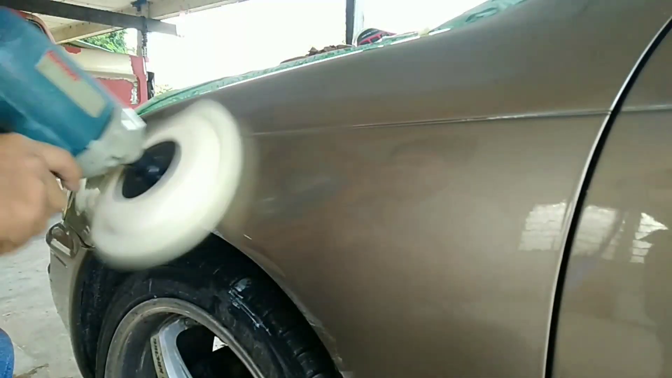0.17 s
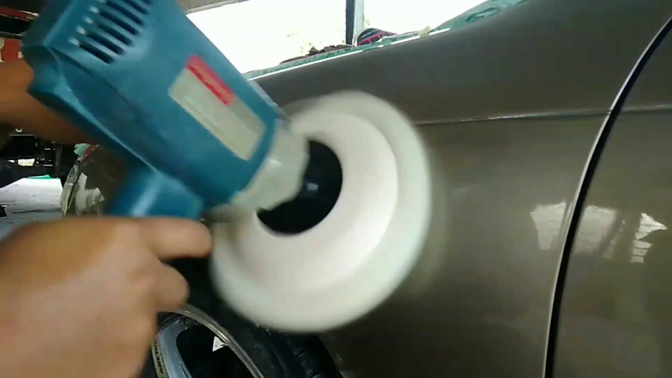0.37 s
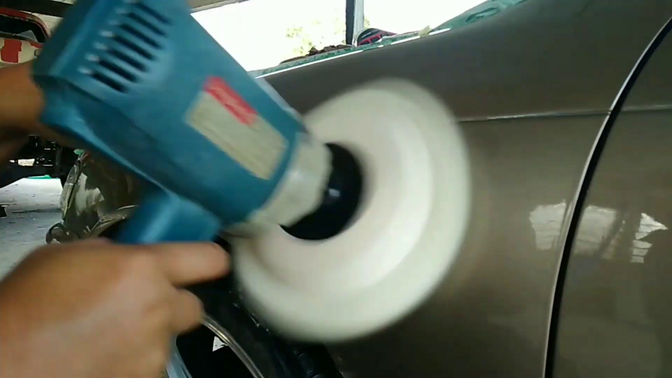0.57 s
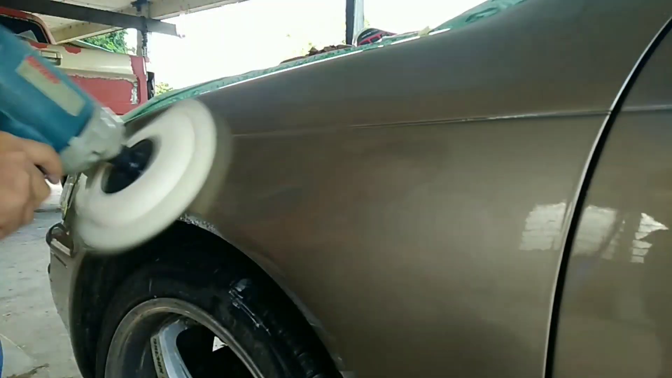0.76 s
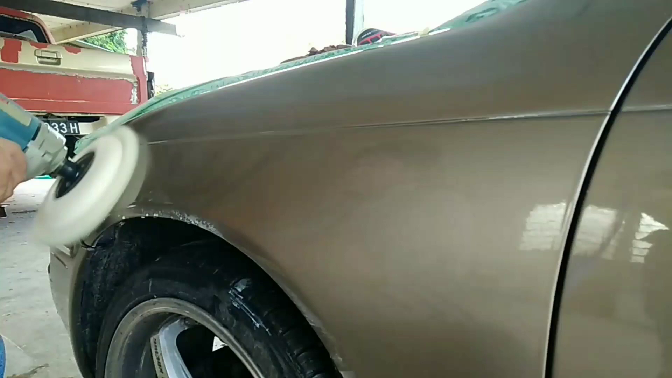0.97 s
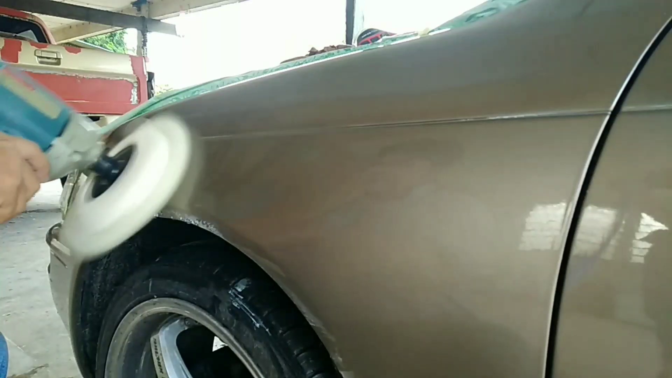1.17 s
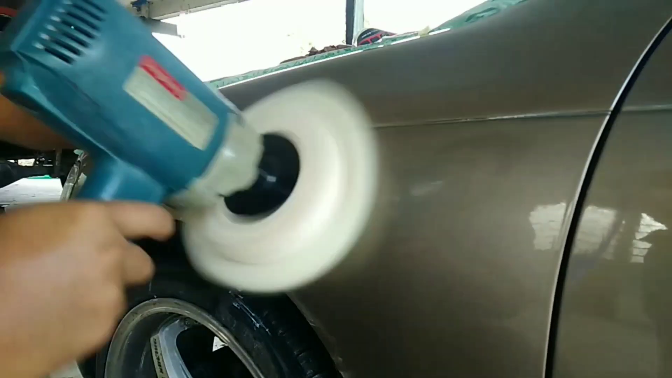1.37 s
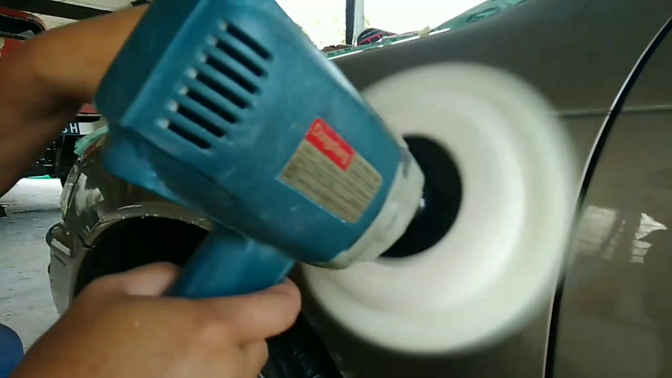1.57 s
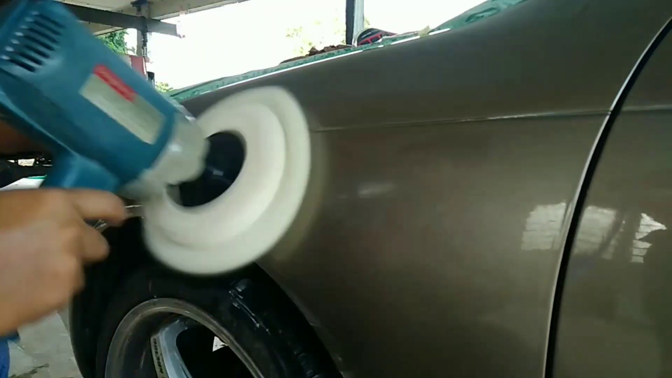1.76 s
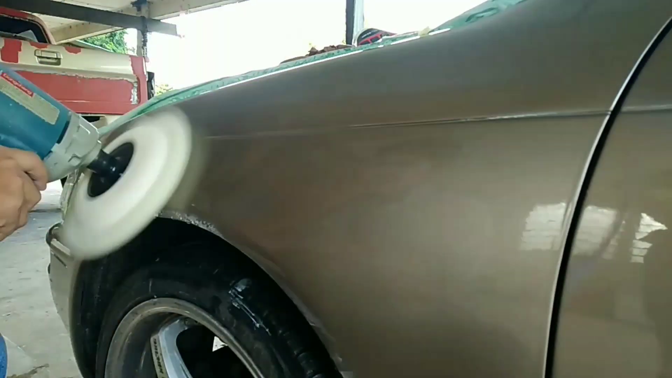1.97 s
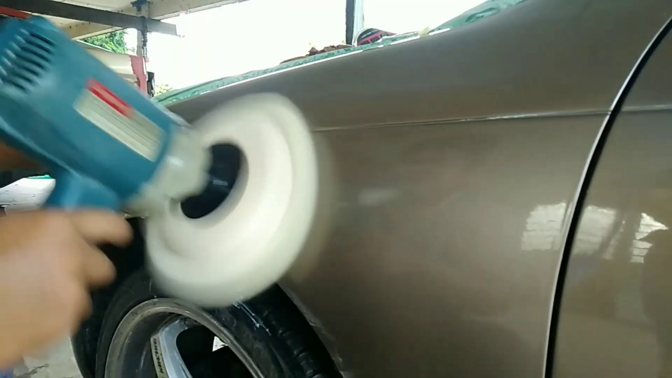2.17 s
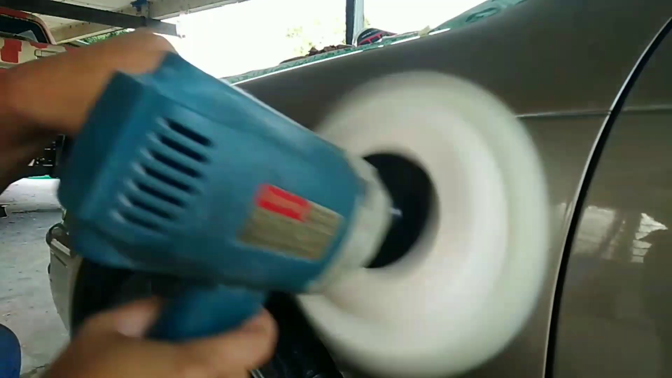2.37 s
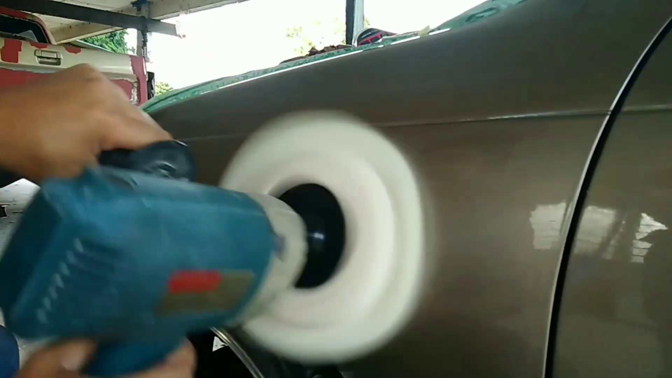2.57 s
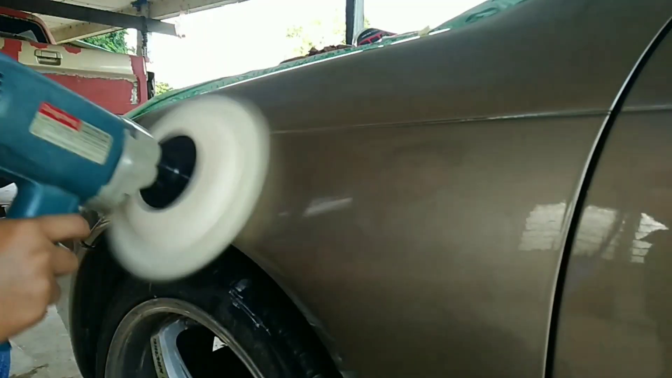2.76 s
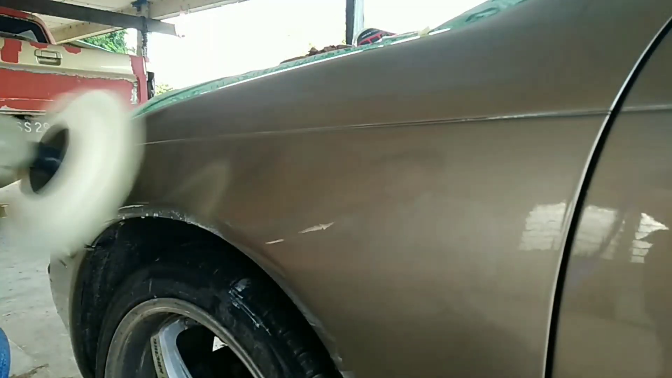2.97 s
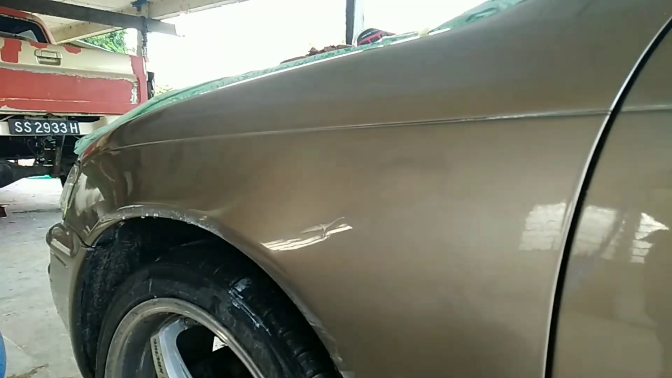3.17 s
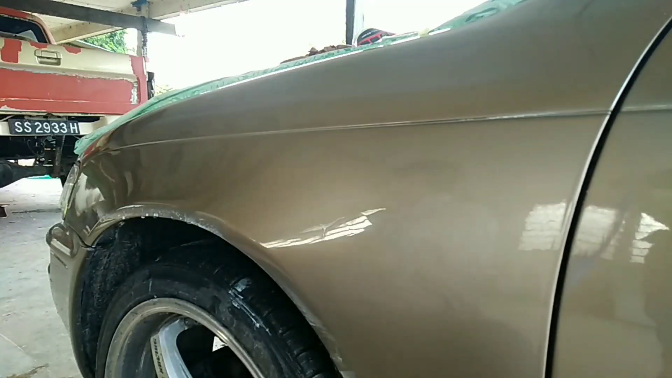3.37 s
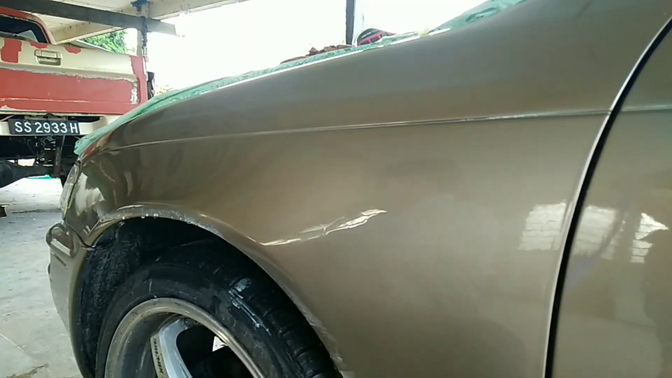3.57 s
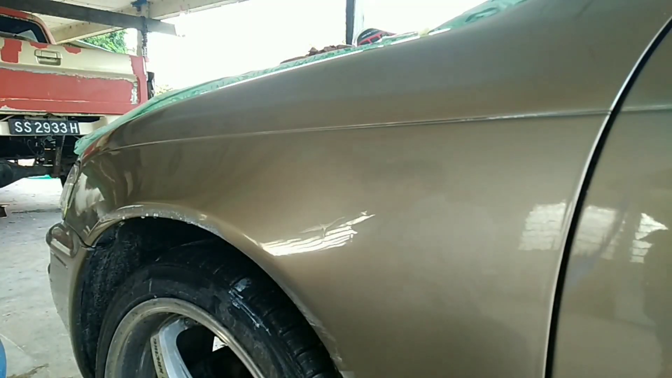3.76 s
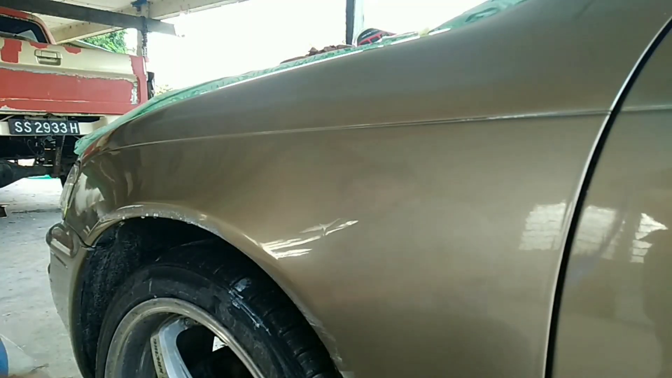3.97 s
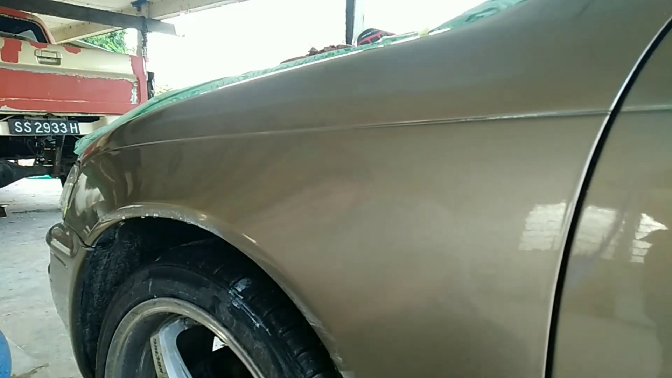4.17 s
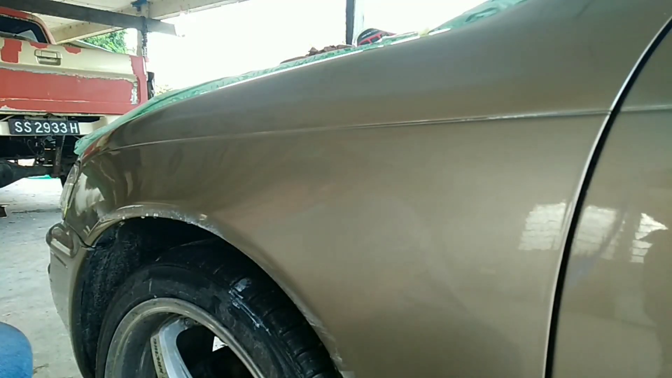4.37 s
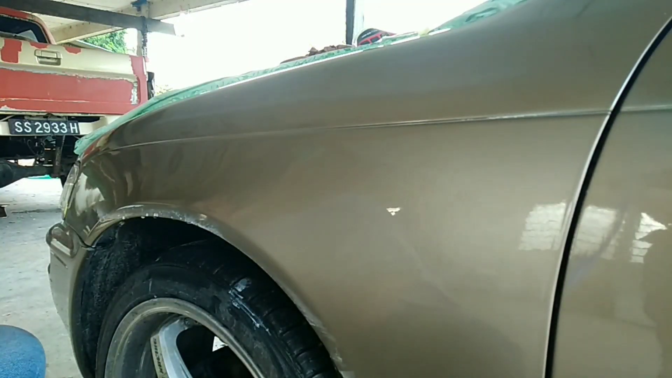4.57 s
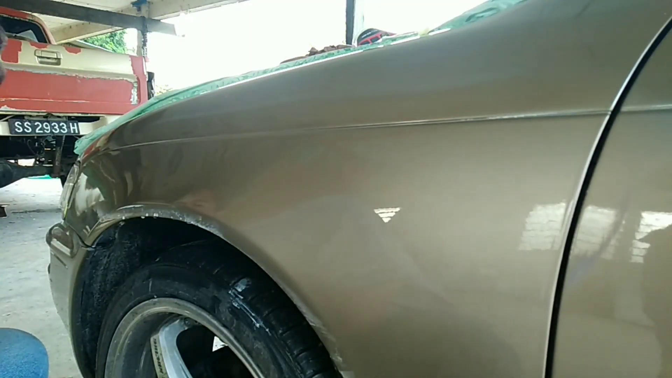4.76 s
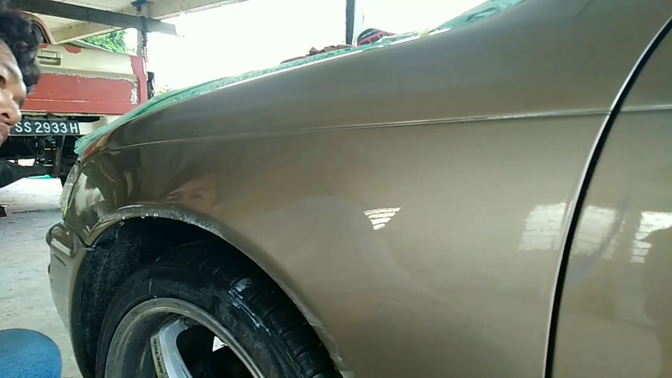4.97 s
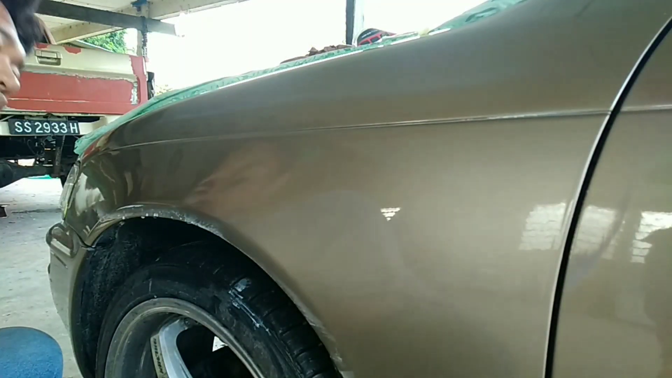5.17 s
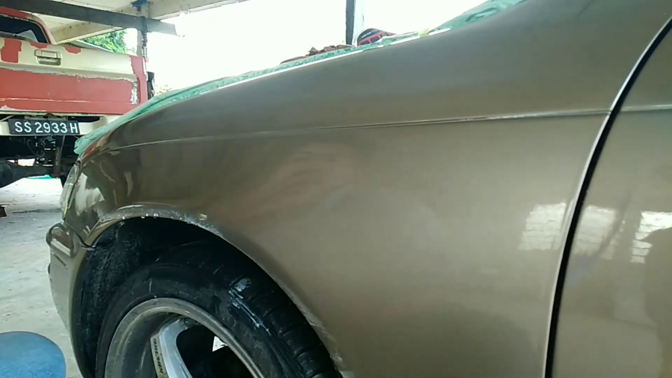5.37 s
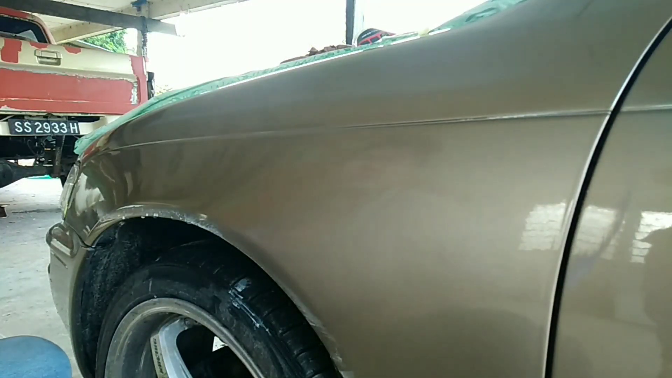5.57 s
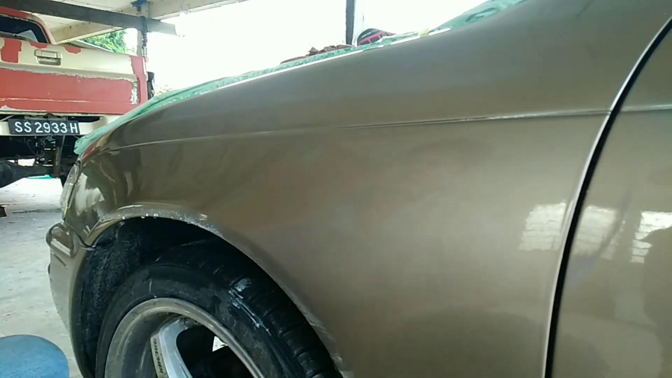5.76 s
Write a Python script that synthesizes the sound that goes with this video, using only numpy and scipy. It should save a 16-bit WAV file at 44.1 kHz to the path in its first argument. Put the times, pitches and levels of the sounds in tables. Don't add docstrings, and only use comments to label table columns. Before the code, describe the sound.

An electric rotary polisher whines and rattles with wavering pitch against car paint, races when lifted, then spins down chattering beside an idling engine.

```python
import sys
import numpy as np
from scipy import signal
from scipy.fft import rfft, irfft, next_fast_len
from scipy.io import wavfile
from scipy.ndimage import uniform_filter1d, map_coordinates

SR = 44100
rng = np.random.default_rng(int(sys.argv[2]) if len(sys.argv) > 2 else 0)


def amplitude_ratio(level_db):
    exponent = np.asarray(level_db, float) / 20
    return 10 ** exponent


def master(y):
    cut = np.clip(np.atleast_2d(y).T, -1, 1)
    pcm = np.round(cut * 32767)
    wavfile.write(sys.argv[1], SR, pcm.astype(np.int16))


N = 257083
T = np.arange(N) / SR

LIFT_S, OFF_S = 3.25, 3.527
LIGHT_HZ = 315
TOP_HISS_DB = 6

MAIN_ORDERS = (11, 12, 13, 22, 24, 33)
# (f/Hz, width/Hz, level/dB)
CASE_MODES = [(3027, 255, -5.5), (3420, 154, -1), (3701, 216, 0), (4092, 145, 0), (4260, 84, 2),
              (4462, 207, -2.5)]
# (f/Hz, level/dB per Hz)
AIR_COLOUR = [(300, -7), (800, -5.5), (1500, -2), (2500, -4.5), (3500, 0), (5600, 2), (7500, -2),
              (9500, -4), (11300, -5.5), (11500, -20)]


def unit(x):
    return x / np.sqrt(np.mean(x ** 2) + 1e-20)


def curve(rows):
    s, values = np.transpose(rows)
    return np.interp(T, s, values)


def flares(rows):
    return sum(db * np.exp(-.5 * ((T - s) / half) ** 2) for s, db, half in rows)


def wobble(rate):
    return map_coordinates(rng.standard_normal(int(N * rate / SR) + 4), [T * rate])


def filtered(x, response):
    m = next_fast_len(N + 8192)
    return irfft(rfft(x, m) * response(np.fft.rfftfreq(m, 1 / SR)), m)[:N]


def colour(points):
    f, db = np.transpose(points)
    return lambda hz: amplitude_ratio(np.interp(np.log(hz + 1), np.log(f + 1), db, -120, -120))


def resonant(modes):
    def response(f):
        total = 0
        for k, (c, w, db) in enumerate(modes):
            total = total + (-1) ** k * amplitude_ratio(db) * 1j * f * w / (c * c - f * f + 1j * f * w)
        return total
    return response


def ringing(x, modes):
    response = resonant(modes)
    return filtered(x, lambda f: response(f) ** 2)


def patchy(depth_db):
    z = signal.stft(rng.standard_normal(N), nperseg=512)[2]
    field = uniform_filter1d(rng.standard_normal(z.shape), size=6, axis=0)
    field = uniform_filter1d(field, size=10, axis=1)
    return signal.istft(z * amplitude_ratio(depth_db * unit(field)), nperseg=512)[1][:N]


def tone(turns, order, drift, flutter_db, rate):
    size = np.sqrt(2) * amplitude_ratio(flutter_db * wobble(rate))
    return size * np.sin(2 * np.pi * order * turns + drift * wobble(rate) + 2 * np.pi * rng.random())


TREMBLE = .4 * wobble(22)


def steady_speed():
    # (t/s, turns f/Hz)
    shaft = [(.05, 300.5), (.24, 317.5), (.53, 313), (.745, 284.7), (.88, 282.5), (1.09, 289.7),
             (1.27, 314.8), (1.52, 313), (1.64, 321.4), (1.88, 290.1), (2.04, 297.7), (2.18, 292.3),
             (2.48, 328.4), (2.57, 324.3), (2.69, 305.3), (2.87, 316.6), (2.99, 314), (3.13, 327.2)]
    free_hz, race_s, race_lag_s = 386.8, 3.225, .125
    drag_hz, coast_lag_s = 457, 4.275
    racing = np.exp(-np.maximum(np.minimum(T, OFF_S) - race_s, 0) / race_lag_s)
    powered = free_hz - (free_hz - curve(shaft)) * racing
    slowing = np.exp(-np.maximum(T - OFF_S, 0) / coast_lag_s)
    return uniform_filter1d((powered + drag_hz) * slowing - drag_hz, size=SR // 25, mode="nearest")


def rotation():
    speed = steady_speed() + TREMBLE
    return speed, np.cumsum(speed) / SR


def effort():
    heavy_hz, lurch_hz_per_s = 285, 60
    speed = steady_speed()
    change = uniform_filter1d(np.gradient(speed) * SR, size=SR // 16, mode="nearest")
    on = np.clip((OFF_S - T) * 10, 0, 1)
    pressure = np.clip((LIGHT_HZ - speed) / (LIGHT_HZ - heavy_hz), 0, 1)
    return on * pressure, on * np.tanh(change / lurch_hz_per_s)


def audible(hz):
    return np.clip((11250 - hz) / 150, 0, 1)


def line_levels(speed):
    # (level/dB, share of the ring, pressure gain/dB, gear play gain/dB, lift step/dB,
    # fade when off/dB per s)
    main = [(-36.5, 0.78, 4, 2.5, -2.5, -26), (-37.5, 0.97, -6, -1.5, 1.2, -5.5),
            (-43.5, 0.89, 2, 2.6, 3, -40), (-36, 0.1, 1, 0, -1.5, -30), (-46.5, 0.1, -5, 0.1, 0, -9),
            (-35.5, 0.1, -0.5, 1, -18, -7)]
    # (f/Hz, width/Hz, level/dB)
    rings = [(1578, 140, 5), (1813, 162, 11), (3025, 88, 14), (3330, 303, 13), (3603, 160, 12.5),
             (3750, 156, 14), (3906, 310, 12.5), (4130, 119, 3), (4355, 180, 13.5), (4570, 99, 12)]
    # (f/Hz, width/Hz, level/dB)
    upper_ring = [(3735, 130, 22.5), (4216, 80, 12.5)]
    # (t/s, level/dB, half length/s)
    mesh_flares = [(-0.5, -6, .04), (1.5, 3.5, 0.02), (1.3, -5.5, 0.069), (2, -10.5, 0.12),
                   (2.5, 8.5, 0.027), (2.5, -12, 0.028), (2.94, -1, 0.035), (3.14, 8, 0.082),
                   (1.8, 8, 0.054), (3.28, -5.5, 0.033), (2.08, -4, .05), (.42, 5, .03), (0.8, 0, .025),
                   (1.4, 3, .04), (1.6, 3, .04), (1, -4, .025), (3, 3, .07), (2.5, -8, .03),
                   (4, -11, 0.059), (5.5, 1.5, .04),
                   (0.18, 3, 0.04), (0.26, -3, 0.015), (0.537, 2, 0.012), (0.66, 2, 0.015),
                    (0.72, -1, 0.014), (1.03, -2, 0.013), (1.18, -4, 0.03), (1.28, 1, 0.025),
                    (1.5, 2, 0.015), (1.82, -8, 0.015), (1.872, 4.8, 0.015), (1.94, -8.1, 0.015),
                    (2.06, -8.8, 0.015), (2.19, 4, 0.012), (2.28, -3.1, 0.025), (2.56, -3, 0.015),
                    (2.724, 0, 0.013), (2.88, 4.1, 0.026), (2.948, -8, 0.015), (3.03, -7.9, 0.015),
                    (3.168, 2.4, 0.015), (3.22, 0, 0.015), (3.267, 2, 0.015), (3.37, 7, 0.025),
                   (0.04, -6.5, 0.02), (0.71, -8.7, 0.02), (1.03, 3.2, 0.08), (1.28, 9.0, 0.05),
                 (1.48, -6.1, 0.08), (1.58, -6.2, 0.02), (1.68, 7.9, 0.03), (1.83, -9.0, 0.05),
                 (2.09, 4.1, 0.08), (2.53, 9.0, 0.05), (2.69, -7.9, 0.03), (2.81, 4.4, 0.02),
                 (3.01, -9.0, 0.05), (3.22, -3.5, 0.02)]
    blade_flares = [(.21, -3, 0.036), (.35, -7, 0.028), (.42, 5.5, 0.027), (.49, -7, 0.021), (.6, 9, 0.046),
                    (.91, -12, 0.027), (1.33, 7.5, 0.031), (1.62, -9, 0.025), (2.52, 0, .03),
                    (2.66, 1, .03), (2.73, -12, 0.023), (2.94, -4, 0.03), (3.05, 5, 0.035),
                    (3.16, 0, 0.023), (.76, 7, .05), (1.03, 6, 0.055), (3.58, 4, 0.044), (.28, 0, .03),
                    (1.5, 1, 0.03), (2.28, 8.5, .035), (2.82, 3, 0.026), (4.14, -11, 0.026),
                    (5.43, -26.5, .06), (1.13, -8, .03), (2.42, -5, .04), (2.77, 5, 0.049), (3.72, -4, .02),
                    (4.79, 3.5, .05), (1.53, 3, 0.032), (.57, -3, .05),
                    (0.07, 3, 0.015), (0.13, -4.9, 0.015), (0.3, 4, 0.013), (0.68, -6.9, 0.015),
                     (0.75, 6, 0.025), (0.89, -7, 0.04), (0.96, 9, 0.015), (1.03, 3.9, 0.015),
                     (1.16, -10.3, 0.015), (1.23, 1, 0.013), (1.63, -5.5, 0.038), (1.72, -10.4, 0.015),
                     (1.77, 4, 0.015), (1.84, 6, 0.015), (1.89, -7.5, 0.015), (2.01, -5.2, 0.015),
                     (2.13, -9.4, 0.015), (2.19, -4.8, 0.015), (2.31, -2, 0.07), (2.57, 5.6, 0.015),
                     (2.68, 2, 0.015), (2.84, -3.4, 0.07), (3.16, -5, 0.034), (3.33, -4.4, 0.015),
                    (3.55, -5.9, 0.024), (3.62, -2.4, 0.015), (3.67, 3.4, 0.015), (3.8, 3.5, 0.015),
                     (3.94, 1.5, 0.016), (3.99, -7, 0.019), (4.01, 4, 0.07), (4.03, 1, 0.023),
                     (4.17, -7, 0.012), (4.42, -2, 0.038), (4.79, 7.5, 0.015), (4.86, -2, 0.025),
                     (4.92, 3.7, 0.013), (5.04, 4, 0.025), (5.12, -7, 0.015), (5.19, 3, 0.024),
                     (5.25, -4.4, 0.015), (5.32, -8.9, 0.014),
                    (0.2, 3.5, 0.02), (0.39, -3.1, 0.02), (0.97, -4.3, 0.02), (1.12, 8.8, 0.02),
                  (1.85, 3.4, 0.08), (2.17, 3.9, 0.05), (2.64, -3.1, 0.02), (2.69, 4.3, 0.02),
                  (2.81, -3.3, 0.02), (3.16, -9.0, 0.02), (3.84, -3.6, 0.02), (3.99, 2.4, 0.05),
                  (5.2, 5.2, 0.03)]
    upper_flares = [(.2, 10, .04), (0.751, 7, .03), (.86, -8, 0.026), (1.006, 7.5, 0.023), (1.9, 0, 0.033),
                    (2.13, 7, .03), (2.21, 6, 0.027), (0.86, 3, .02), (2.87, -12, 0.18), (3.2, 5, .05),
                    (2.95, -8, .1), (2.32, 6, .04), (2.52, 7, .03), (3.15, 5.5, .04), (3.45, 6.5, .1),
                    (1.32, 2, .04), (1.86, 1.5, .06),
                    (0.17, -6.1, 0.015), (0.25, -9.3, 0.015), (0.4, 5, 0.022), (1.56, -10.8, 0.015),
                     (1.67, 8.7, 0.016), (2.17, -9, 0.015), (2.36, 7.5, 0.015), (2.42, -11.0, 0.015),
                     (2.56, 2.8, 0.069), (2.76, -8.6, 0.07), (2.91, -11.0, 0.07), (3.03, -10.3, 0.025),
                     (3.12, 6, 0.04), (3.26, -9.8, 0.04),
                    (0.83, 4.8, 0.05), (2.06, -6.3, 0.03), (2.21, -5.3, 0.08), (2.74, -7.2, 0.05),
                  (2.9, -9.0, 0.08), (3.22, 8.1, 0.02)]
    mesh2_flares = [(.94, 5.5, 0.045), (1.35, 7, 0.06), (1.54, 6.5, 0.052), (1.68, -7, 0.034),
                    (2.1, 11, 0.024), (2.66, 9, 0.023), (3.03, 5.5, 0.049), (3.49, 7, .03), (0.0, 2, 0.037),
                    (.57, -9, .04), (.24, -6, .03), (2.76, -10, 0.028), (2.94, -6, .03), (4.27, 12, .05),
                    (4.52, 15, .13),
                    (0.05, 4, 0.025), (0.12, -9.3, 0.015), (0.23, -6.0, 0.015), (0.62, -5.5, 0.025),
                     (0.93, 4.1, 0.025), (1.0, -9.7, 0.013), (1.08, 10.5, 0.013), (1.13, -10.9, 0.015),
                     (1.26, -9.9, 0.015), (1.88, 6, 0.036), (2.01, -11.0, 0.025), (2.16, -5, 0.025),
                     (2.48, -4, 0.023), (2.54, 5, 0.015), (2.71, -6, 0.082), (2.81, 10, 0.015),
                     (3.18, 5, 0.015), (3.47, 3, 0.015)]
    blade2_flares = [(.38, 6.5, .1), (1.42, 5, .1), (2.03, 10, .1), (2.72, 11, .04), (2.88, 12, 0.033),
                     (4.75, 4, .12), (4.42, -8, .08)]
    mesh3_flares = [(0.88, 5.5, .04), (1.0, 1, .06), (1.393, 5.5, 0.044), (2.1, 2, 0.034),
                    (2.36, -6, 0.049), (2.87, 10, 0.043), (2.193, 5, .04), (3.4, 4, .04), (0.47, -4, .03),
                    (4.25, -6, .08), (2.75, 2.5, .1),
                    (0.43, -10.0, 0.015), (0.48, 8, 0.013), (0.66, 1, 0.07), (0.9, -5.8, 0.015),
                     (1.28, -8, 0.015), (1.83, -10.7, 0.015), (1.9, -7.2, 0.015), (2.02, 9.5, 0.014),
                     (2.14, -6.4, 0.015), (2.3, -6, 0.015), (2.66, -11.0, 0.015), (2.75, -6.5, 0.025),
                     (3.14, 5, 0.027), (3.24, -4, 0.024)]
    line_flares = (mesh_flares,
                   blade_flares,
                   upper_flares,
                   mesh2_flares,
                   blade2_flares,
                   mesh3_flares)

    def ring_db(hz, modes):
        power = sum(amplitude_ratio(2 * db) / (1 + (2 * (hz - c) / w) ** 2) ** 2 for c, w, db in modes)
        return 10 * np.log10(1 + power)

    pressure, lurch = effort()
    lifted = np.clip((T - LIFT_S) * 20, 0, 1)
    off_s = np.maximum(T - OFF_S, 0)
    levels = []
    for k, settings, rows in zip(MAIN_ORDERS, main, line_flares):
        db, share, press_db, play_db, lift_db, fade_db = settings
        modes = upper_ring if k == MAIN_ORDERS[2] else rings
        level = db + share * ring_db(k * speed, modes)
        level = level + press_db * pressure + play_db * abs(lurch)
        level = level + lift_db * lifted + fade_db * off_s + flares(rows)
        unrest_db = 0.5 + 1.95 * (k > 20) + 1.78 * (T > OFF_S + .3)
        levels.append(level + unrest_db * wobble(14))
    return levels


def whine():
    # (order, index of main order, level/dB)
    sidebands = [(10, 0, -18), (10.75, 0, -12), (11.25, 0, -13), (10.5, 0, -22), (12.75, 2, -17),
                 (13.25, 2, -18), (23, 3, -11), (25, 4, -6), (9.3, 0, -26), (14, 0, -17)]
    speed, turns = rotation()
    levels = line_levels(speed)
    lines = list(zip(MAIN_ORDERS, levels))
    lines += [(k, levels[i] + db) for k, i, db in sidebands]
    total = 0
    for k, db in lines:
        slack = np.clip((T - LIFT_S) * 10, 0, 1) * (k != 12)
        line = tone(turns, k, .03 + .014 * k + .07 * k * slack, flutter_db=.7 + .06 * k + slack, rate=75)
        total = total + amplitude_ratio(db - 0.7) * audible(k * speed) * line
    return total


def coasting():
    # (t/s, level/dB)
    coast = [
        (3.6, -75),
        (4.1, -60),
        (4.6, -50),
        (5.0, -44.5),
        (5.3, -43),
        (5.41, -59),
    ]
    # (f/Hz, width/Hz, level/dB)
    housing = [(3660, 330, -4), (4180, 530, -6.5), (5640, 1300, 2), (8770, 1150, -4)]
    chatter_orders = (22, 23, 24, 25, 33, 35, 36, 37)
    speed, turns = rotation()
    total = 0
    for k in chatter_orders:
        ring = sum(amplitude_ratio(db) / (1 + (2 * (k * speed - c) / w) ** 2) for c, w, db in housing)
        line = tone(turns, k, 1.4, flutter_db=3.5, rate=70)
        total = total + amplitude_ratio(-7 * (k > 30)) * ring * line
    return amplitude_ratio(curve(coast)) * total


def air_level():
    # (t/s, level/dB)
    near = [(0, -30), (.12, -32.5), (.36, -35), (.59, -32), (.81, -29.5), (1.02, -31), (1.3, -35.5),
            (1.7, -32.5), (1.81, -30), (2.15, -29.5), (2.29, -33.5), (2.43, -34), (2.71, -29.5), (2.9, -30),
            (3.6, -33), (3.85, -38), (4.4, -43), (5.41, -51.5)]
    return curve(near)


def rattle_level():
    # (t/s, level/dB, half length/s)
    rattle_flares = [(.36, 1, 0.056), (1.4, -7, 0.087), (1.94, -0.5, 0.17), (2.36, -2, 0.043),
                     (2.9, 3.5, 0.099), (3.39, 2, .08), (3.66, 2.5, 0.11), (3.87, 4, .08),
                     (2.25, 3.5, 0.066), (1.21, 2, .05), (1.77, 2, 0.07), (0.62, 4.5, .05)]
    pressure, lurch = effort()
    return air_level() - 0.47 + 6 * pressure + 8.5 * abs(lurch) * (1 - pressure) + flares(rattle_flares)


def runout():
    speed, turns = rotation()
    ticks = 0
    for k in range(3, 38):
        ticks = ticks + audible(k * speed) * tone(turns, k, .5 + 0.016 * k, flutter_db=3.0, rate=25)
    in_case = amplitude_ratio(rattle_level() - 19) * ringing(ticks, CASE_MODES)
    return in_case + amplitude_ratio(air_level() - 18.0) * filtered(ticks, colour(AIR_COLOUR))


def gear_rattle():
    turns = rotation()[1]
    beat = 1 + 0.29 * np.cos(2 * np.pi * turns) + 0.087 * np.cos(2 * np.pi * 0.3 * turns)
    return amplitude_ratio(rattle_level() - 1.7) * unit(ringing(beat * patchy(depth_db=0.0), CASE_MODES))


def cooling_air():
    return amplitude_ratio(air_level() + 6.5) * unit(filtered(patchy(depth_db=1.5), colour(AIR_COLOUR)))


def top_hiss():
    # (f/Hz, level/dB per Hz)
    top_colour = [(11150, -30), (11350, -4), (13500, -3), (14800, -2), (15400, 2), (15740, 2)]
    slowing_db = np.log2(np.minimum(steady_speed() / LIGHT_HZ, 1))
    hiss = unit(filtered(patchy(depth_db=0.8), colour(top_colour)))
    return amplitude_ratio(air_level() + TOP_HISS_DB + slowing_db) * hiss


def slot_whistle():
    # (f/Hz, width/Hz, level/dB)
    vents = [(1360, 200, 0.5), (1846, 430, 4.5), (1630, 320, -6.5)]
    # (f/Hz, width/Hz, level/dB)
    vents_pressed = [(1310, 140, -0.5), (1795, 230, 4)]
    # (t/s, level/dB, half length/s)
    slot_flares = [
        (.75, 2.5, .08),
        (1.3, 3.5, 0.095),
        (2.05, 2, .08),
        (2.3, -2.5, 0.072),
        (2.82, 3, 0.078),
        (3.13, -4.5, 0.073),
        (3.52, 2.5, 0.096),
        (3.95, 2.5, 0.11),
        (4.45, -3, 0.27),
    ]
    draught, grip = patchy(depth_db=0.0), effort()[0]
    whistle = (1 - grip) * unit(ringing(draught, vents)) + grip * unit(ringing(draught, vents_pressed))
    level = -34.5 - 1.5 * grip + 0.76 * (air_level() + 32.0)
    return amplitude_ratio(level + flares(slot_flares) + 0.67 * wobble(6.05)) * whistle


def pad_groan():
    # (t/s, level/dB, half length/s)
    groan_flares = [
        (-0.5, 9, 0.045),
        (2, -8, 0.042),
        (0.5, -7, 0.063),
        (2.5, 4, 0.066),
        (3, 4, 0.05),
                    (.05, 3, .06),
        (.66, 2, .04),
        (.98, 2, .06),
        (1.8, 3, .06),
        (2.13, 3, .07),
        (2.66, 5, .05),
    ]
    pressure, lurch = effort()
    level = -42.5 + 17 * np.tanh(2 * pressure) + 6.5 * np.maximum(-lurch, 0) * (1 - pressure)
    level = level + flares(groan_flares)
    firm = np.clip((level + 44.5) / 8, 0, 1)
    return amplitude_ratio(level - 9) * firm * tone(rotation()[1], 4.6, 1.3, flutter_db=3.5, rate=90)


def imbalance():
    # (t/s, level/dB, half length/s)
    imbalance_flares = [
        (.8, 0, .2),
        (1.95, 1, 0.084),
        (2.9, 6.5, 0.15),
    ]
    shake = tone(rotation()[1], 0.98, .5, flutter_db=3.5, rate=20)
    return amplitude_ratio(1.59 * air_level() - 5 + flares(imbalance_flares)) * (T < LIFT_S) * shake


def motor_noise():
    swell = amplitude_ratio(0.78 * wobble(7.55))
    return swell * (gear_rattle() + cooling_air() + top_hiss()) + slot_whistle() + pad_groan() + imbalance()


def sizzle():
    sizzle_orders = (52, 53, 54, 55)
    sizzle_db = [-15, -13, -11, -10]
    # (t/s, level/dB, half length/s)
    sizzle_flares = [
        (.7, 4, .04),
        (.98, 5, .06),
        (1.06, 4, .03),
        (1.9, 2, .08),
        (2.17, 4, .05),
        (2.75, -3, .1),
    ]
    turns = np.cumsum(steady_speed()) / SR
    lines = 0
    for k, db in zip(sizzle_orders, sizzle_db):
        lines = lines + amplitude_ratio(db) * tone(turns, k, 1.2, flutter_db=4, rate=40)
    return effort()[0] * amplitude_ratio(air_level() + TOP_HISS_DB + flares(sizzle_flares)) * lines


def knock():
    # (t/s, level/dB, f/Hz, time to fall 60 dB/s)
    blow = (4.9725, -23, 330, .02)
    s, db, hz, t60 = blow
    t = np.maximum(T - s, 0)
    body = np.sin(2 * np.pi * hz * t) + .6 * np.sin(2 * np.pi * 1.6 * hz * t)
    return amplitude_ratio(db + 2.5 - 60 * t / t60) * (1 - np.exp(-t / .0007)) * body


def workshop():
    # (order, level/dB)
    idle_orders = [(1, -60), (2, -51.5), (3, -60), (4, -48.5), (6, -55), (7, -69), (8, -45.5), (15, -61),
                   (30, -57), (43, -50.5), (45, -55)]
    # (f/Hz, level/dB per Hz)
    shop = [(20, -20), (40, -24), (130, -3.5), (250, -0.5), (380, -15.5), (580, -9), (1000, -12),
            (1400, -7.5), (2500, -15.5), (6000, -49), (15800, -39)]
    # (t/s, level/dB, half length/s)
    throb_swell = [
        (2.75, 8.5, 0.26),
        (0.55, 3, .1),
        (5.3, -12, .15),
    ]
    idle_hz, stumble_s, recover_s = 30.79, 3.445, .17
    stumble = (T > stumble_s) * np.exp(-abs(T - stumble_s) / recover_s)
    turns = np.cumsum(idle_hz - 1.2 * stumble) / SR
    hum = 0
    for k, db in idle_orders:
        level = db - 15 * stumble * (k > 5)
        hum = hum + amplitude_ratio(level) * tone(turns, k, 0.1, flutter_db=0.7, rate=14)
    floor = unit(filtered(patchy(depth_db=0.5), colour(shop)))
    low = colour([(4, -4), (18, -7), (35, -1.5), (70, -10), (130, -11.0)])
    throb = unit(filtered(rng.standard_normal(N), low))
    throb_db = -44 - 4.5 + flares(throb_swell) + 1.9 * wobble(2.94)
    return hum + amplitude_ratio(throb_db) * throb + amplitude_ratio(-42.0 + 0.98 * wobble(1.994)) * floor


def later():
    # (order, level/dB)
    later_orders = [(1, -48), (2, -57), (3, -52), (4, -44), (5, -63), (6, -72), (8, -57)]
    # (f/Hz, level/dB per Hz)
    later_floor = [(20, -19), (60, -1), (200, -16.5), (450, -11), (680, -16), (950, -10.5), (1500, -19.5),
                   (2100, -16), (3200, -22), (6000, -30), (9000, -22), (12500, -29.5), (15800, -25)]
    # (f/Hz, width/Hz, level/dB)
    yard = [(668, 70, 1), (930, 59, -5), (1815, 44, -1), (2180, 100, -2.5)]
    turns = 31.4 * T + 0.6
    push = 0
    for k, db in later_orders:
        size = amplitude_ratio(db) * np.sqrt(2) * amplitude_ratio(2.4 * wobble(10))
        push = push + size * np.cos(2 * np.pi * k * turns + 0.27 * wobble(9))
    murmur = unit(ringing(patchy(depth_db=2.5), yard))
    floor = unit(filtered(patchy(depth_db=1.5), colour(later_floor)))
    return push + amplitude_ratio(-39.5) * floor + amplitude_ratio(-46.5) * murmur


def echo(x):
    t = np.arange(SR // 2) / SR
    tail = amplitude_ratio(-60 * t / 0.22) * rng.standard_normal(len(t))
    return x + amplitude_ratio(-14.0) * signal.fftconvolve(x, tail / np.linalg.norm(tail))[:N]


def side_puffs():
    # (t/s, low f/Hz, high f/Hz, level/dB)
    puffs = [(.205, 7600, 9100, -41), (.205, 10300, 11900, -41), (.765, 9600, 11200, -39),
             (.765, 11700, 14000, -36), (.765, 14400, 15900, -37), (1.55, 9600, 11900, -39),
             (1.55, 14400, 15900, -39), (1.972, 4100, 5200, -32), (2.39, 5700, 7000, -39),
             (2.39, 9600, 11900, -38), (2.67, 13800, 15400, -35), (3.06, 9600, 11900, -36),
             (4.575, 7600, 9100, -52), (5.525, 8300, 9800, -61)]
    size = 2048
    side, hz = np.zeros(N), np.fft.rfftfreq(size, 1 / SR)
    for s, low_hz, high_hz, db in puffs:
        puff = unit(irfft(rfft(rng.standard_normal(size)) * (hz > low_hz) * (hz < high_hz)))
        side[round(s * SR) - size // 2:][:size] += amplitude_ratio(db - 0.5) * signal.windows.tukey(size, .5) * puff
    return side


def scene():
    after = np.clip((T - 5.415) / 0.013 + .5, 0, 1)
    polishing = echo(whine() + coasting() + runout()) + motor_noise() + workshop() + knock()
    mono = (1 - after) * polishing + after * later() + sizzle()
    return np.array([mono, mono])


def band_limit(x):
    return signal.sosfilt(signal.butter(12, 17060, fs=SR, output="sos"), x)


def record(dry):
    kept = filtered(dry[0], lambda hz: hz < 15720)
    side = side_puffs()
    return band_limit(np.array([kept + side, kept - side]))


dry = scene()
out = record(dry)
master(out)
```